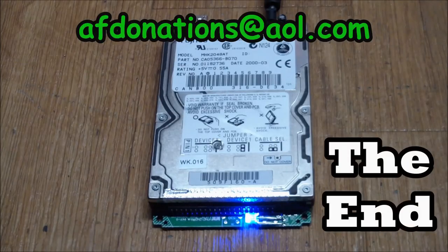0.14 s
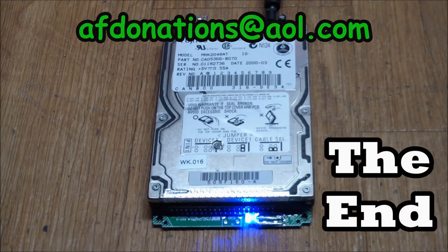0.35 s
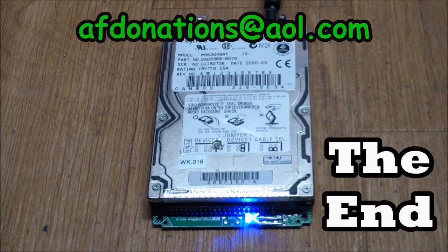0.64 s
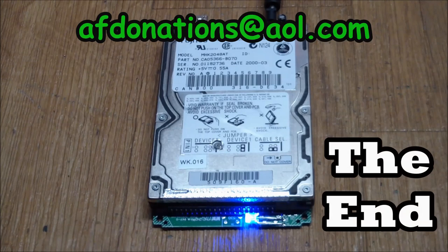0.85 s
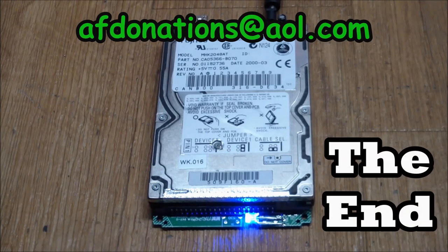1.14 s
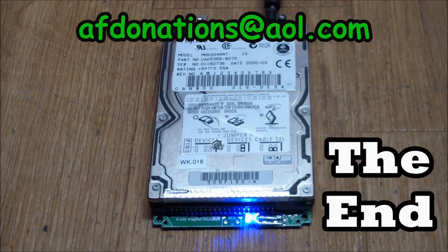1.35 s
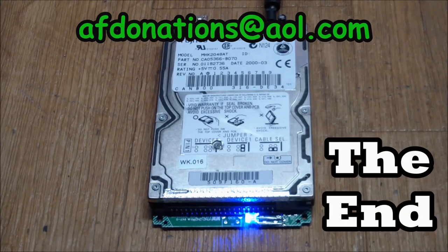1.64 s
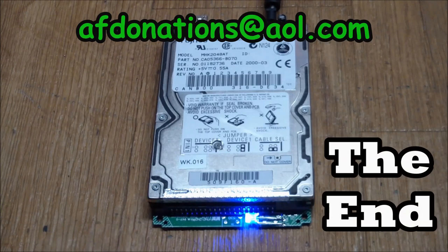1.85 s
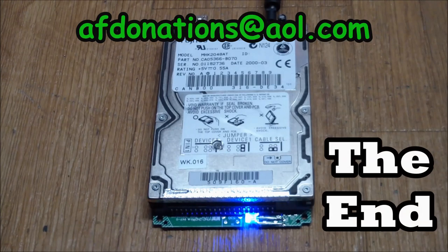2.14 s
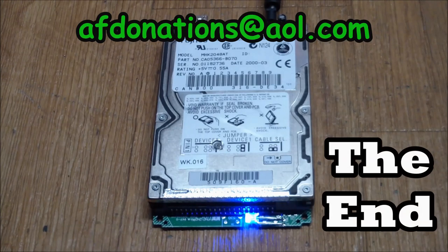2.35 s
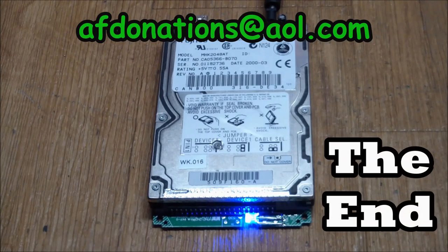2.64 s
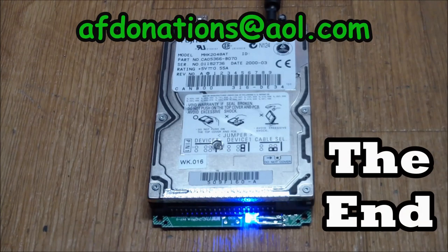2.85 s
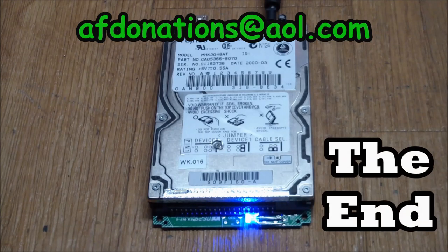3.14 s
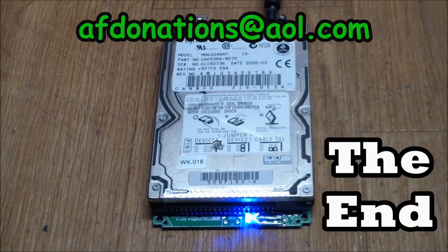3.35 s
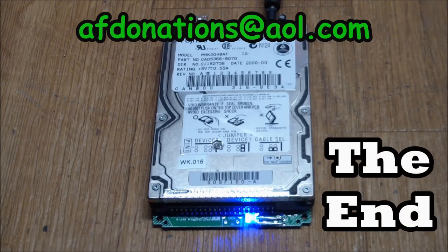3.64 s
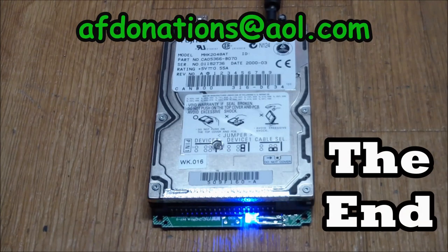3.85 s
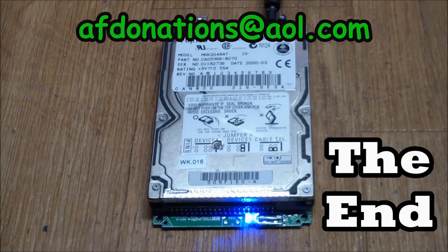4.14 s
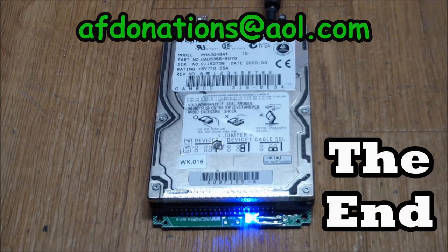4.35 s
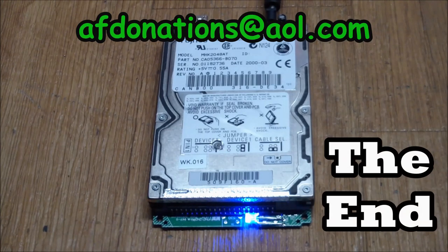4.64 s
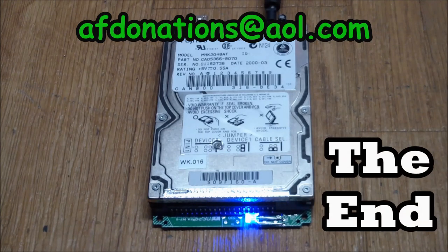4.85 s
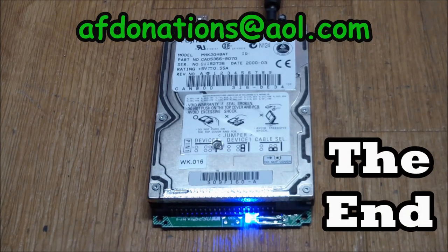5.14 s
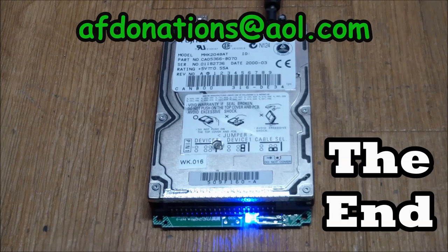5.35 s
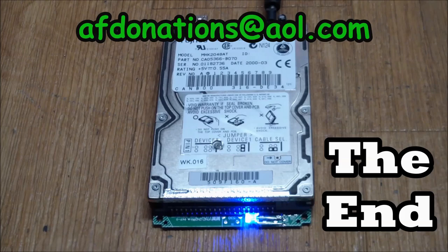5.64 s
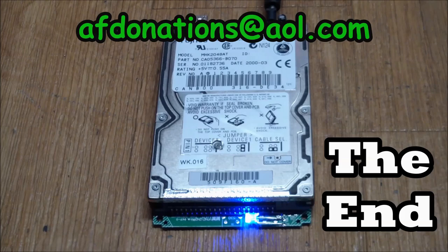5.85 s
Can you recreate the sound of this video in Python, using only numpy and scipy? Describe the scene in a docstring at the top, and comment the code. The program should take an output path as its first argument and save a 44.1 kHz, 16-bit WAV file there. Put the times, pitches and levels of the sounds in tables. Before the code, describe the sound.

Close up in a small room, a broken hard drive spins with a thin, wavering metallic whine and soft hiss over a low hum. Sharp, ringing clicks stand out above it roughly every half second, alternating between a single knock and a knock with a quick, softer rebound as the arm latches. The clicking hesitates once around the middle, then resumes in the same rhythm.

```python
"""A failing laptop hard drive, lying on a wooden floor a hand's width from the microphone.
About once a second, in rounds of three tries, the head arm swings out and knocks on its stop,
then swings back, knocks again and drops into its latch; each blow rings the case.
The spindle's ball bearings whine throughout, over platter hiss and the low hum of a small room."""
import sys
import numpy as np
from scipy import signal
from scipy.fft import rfft, irfft
from scipy.io import wavfile

SR = 44100
rng = np.random.default_rng(int(sys.argv[2]) if len(sys.argv) > 2 else 0)


def generate_wav(signal):
    """Clip the signal to [-1, 1] and save it as 16-bit WAV at the path in sys.argv[1]."""
    frames = np.transpose(np.atleast_2d(signal))
    scaled = np.clip(frames, -1, 1) * 32767
    pcm = np.round(scaled).astype(np.int16)
    wavfile.write(sys.argv[1], SR, pcm)


N = 263718
T = np.arange(N) / SR
SIDES = np.array([[1], [-1]])  # left, right


def undb(db):
    """Decibels to gain."""
    return 10 ** (np.asarray(db) / 20)


def unit(x):
    """Scale to rms 1."""
    return x / np.sqrt(np.mean(x ** 2))


def colour(x, points):
    """Filter by (freq_hz, gain_db) points joined on a log-frequency axis."""
    hz, db = np.transpose(points)
    bins = np.fft.rfftfreq(N, 1 / SR) + 1
    return irfft(rfft(x) * undb(np.interp(np.log(bins), np.log(hz), db)), N)


def noise(points):
    """Coloured noise of rms 1."""
    return unit(colour(rng.standard_normal(N), points))


def walk(rate):
    """A random drift of spread near 1 that turns about rate times a second."""
    steps = rng.standard_normal(1024)
    return np.interp(T * rate, np.arange(len(steps)), steps)


def swell(curve):
    """A (time_s, level_db) curve, in dB about the mean of its points."""
    s, db = np.transpose(curve)
    return np.interp(T, s, db - np.mean(db))


def taps(rows):
    """One impulse for each (start_s, level_db) row."""
    out = np.zeros(N)
    for s, db in rows:
        if 0 <= s <= T[-1]:
            out[round(s * SR)] += undb(db)
    return out


def bursts(rows):
    """Envelope that jumps and fades for each (start_s, fade_s, level_db) row."""
    return sum(undb(db) * (T >= s) * np.exp(-np.abs(T - s) / fade) for s, fade, db in rows)


def through(x, response):
    """Convolve, keeping the length."""
    return signal.fftconvolve(x, response)[:N]


def softened(x, hz):
    """A soft contact pushes for longer and so loses its treble."""
    return signal.sosfilt(signal.butter(2, hz, fs=SR, output="sos"), x)


def swings(rounds_s=(-.0986, 3.4586), retry_s=1.0187, back_s=.5379, out_db=0.45, back_db=-0.5):
    """Three tries a round, two knocks a try: rows of (start_s, level_db, swing: 0 out, 1 back)."""
    tries = [start + k * retry_s for start in rounds_s for k in range(3)]
    return [(s, out_db, 0) for s in tries] + [(s + back_s, back_db, 1) for s in tries]


def spindle_turning(sag=.0012, recover_s=0.11, wander=0.00041):
    """The spindle's running time: it slows a little as the arm swings back, then catches up."""
    drag = sum(np.exp(-((T - s + recover_s) / recover_s) ** 2) for s, _, back in swings() if back)
    return np.cumsum(1 - sag * (drag - drag.mean()) + wander * walk(6)) / SR


# Bearing tones are multiples of ORDER_HZ; the turning ball cage adds a sideband on either side.
ORDER_HZ, CAGE_HZ = 192.9, 29.6
# The bearing tones that stand out up close: order, lower_sideband_db, centre_db, upper_sideband_db
LOUD_TONES = [(12, -59.5, -76.5, -52), (20, -84, -69.5, -61.5), (22, -64.5, -87, -52.5),
              (23, -60, -81, -73), (24, -66, -77, -63), (25, -61, -82, -64.5), (26, -67, -73, -53),
              (28, -64.5, -74, -61.5), (30, -70, -55.5, -65), (36, -65, -60, -72), (38, -66, -64.5, -74),
              (42, -71, -65, -68), (54, -61, -62.5, -70), (66, -66, -77, -75)]

def bearing_tones(first_order=14, last_order=78, soft_db=-65, fall_db_per_order=.11, scatter_db=5):
    """The loud tones, then the softer even orders, each shared by chance among its three lines."""
    loud_orders = [row[0] for row in LOUD_TONES]
    rows = list(LOUD_TONES)
    for order in range(first_order, last_order + 1, 2):
        shares = undb(scatter_db * rng.standard_normal(size=3))
        shares_db = 20 * np.log10(shares / np.linalg.norm(shares))
        if order not in loud_orders:
            rows.append((order, *(soft_db - fall_db_per_order * (order - first_order) + shares_db)))
    return rows


# Three places where the whine slowly swells and sinks, low to high: pitch_hz
SWELL_PITCHES = [2320, 4320, 5040]
# The rise and fall at each of them: time_s, relative_level_db
LOW_SWELL = [(0.0, -57), (1.1, -51), (1.85, -56.5), (2.28, -58), (2.68, -53.5), (3.18, -54.5),
             (4.36, -50.5), (5.46, -56), (5.98, -54.5)]
MID_SWELL = [(0.0, -58), (0.28, -65), (0.9, -53.5), (2.08, -55), (2.56, -60), (2.9, -52), (3.9, -51),
             (4.55, -55.5), (5.98, -51.5)]
HIGH_SWELL = [(0.0, -54.5), (0.78, -49.5), (1.78, -61.5), (2.58, -52), (3.71, -63), (4.46, -58),
              (5.48, -55.5), (5.98, -63)]

def whine(turning, whine_db=3, drift_db=2.1, flutter_db=1.23, jitter_rad=0.35, width_rad=0.26):
    """Each bearing tone and its sidebands follow the spindle and beat at the cage rate: a fine whirr."""
    swells = [swell(curve) for curve in (LOW_SWELL, MID_SWELL, HIGH_SWELL)]
    cage = np.exp(2j * np.pi * CAGE_HZ * turning)
    out = np.zeros((2, N))
    for order, *levels_db in bearing_tones():
        hz = order * ORDER_HZ
        near = [curve for pitch, curve in zip(SWELL_PITCHES, swells) if abs(hz - pitch) < 125]
        drift = drift_db * walk(1.47)
        gain = undb(whine_db + (near[0] if near else drift) + flutter_db * walk(50))
        lower, centre, upper = undb(levels_db) * np.exp(2j * np.pi * rng.random(3))
        beating = lower * cage.conj() + centre + upper * cage
        shake = jitter_rad * hz / SWELL_PITCHES[-1] * walk(40)  # higher orders shake more
        tone = gain * beating * np.exp(1j * (2 * np.pi * hz * turning + shake))
        # short waves reach the microphone's two ports out of step
        skew = width_rad * hz / TOP_HZ * rng.choice([-1, 1])
        out += np.real(tone * np.exp(1j * SIDES * skew))
    return out


# Outline of the many weak bearing tones: freq_hz, gain_db
SHEEN_COLOUR = [(1000, -7), (2600, 0), (3600, -13), (4500, 7), (6500, -3.5), (9000, -1.5), (12000, -26),
                (15500, -13)]
# Stereo width of sheen and platter hiss at the microphone: freq_hz, side_minus_mid_db
DRIVE_WIDTH = [(400, -3), (1500, -3.5), (3000, -24), (6000, -6), (10000, -10), (15000, 4)]

def bearing_sheen(turning, level_db=-52, line_hz=3.3, skirt_hz=42.2, odd_db=-4):
    """Weak orders and sidebands: narrow, unsteady lines that give the hiss a metallic sheen."""
    hz = np.fft.rfftfreq(N, 1 / SR)
    order = np.round(hz / ORDER_HZ)
    offset = hz - order * ORDER_HZ
    detune = offset - np.round(offset / CAGE_HZ) * CAGE_HZ
    skirts = undb(odd_db * (order % 2)) * np.exp(-(offset / skirt_hz) ** 2 / 2)
    comb = skirts / np.hypot(1, detune / line_hz)
    lines = [unit(irfft(rfft(noise(SHEEN_COLOUR)) * comb, N)) for _ in range(2)]
    mid, side = (np.interp(turning, T, x) for x in lines)  # pitch follows the spindle
    return undb(level_db) * (mid + SIDES * colour(side, DRIVE_WIDTH))


# The platters' hiss from a hand's width away: freq_hz, gain_db
HISS_COLOUR = [(100, 6.5), (400, 4), (900, 2), (1500, -2.5), (3400, -1.5), (4000, 2.5), (4600, 6),
               (5400, -4), (6200, 3), (8000, -3.5), (11500, -7.5), (15500, -9)]

def platter_hiss(level_db=-50, flicker_db=1.5):
    """Air dragged round by the platters."""
    mid, side = noise(HISS_COLOUR), colour(noise(HISS_COLOUR), DRIVE_WIDTH)
    return undb(level_db + flicker_db * walk(130)) * (mid + SIDES * side)


# Mains and fan hum, with two steady tones from the drive's spindle: pitch_hz, level_db
HUM_TONES = [(60, -55), (120, -48.5), (169, -61.5), (801, -55), (1927, -70)]
# The room's rumble beneath them: freq_hz, gain_db
RUMBLE_COLOUR = [(25, -5), (60, 3), (115, 3.5), (190, -6), (280, -21), (700, -35), (2000, -53)]
# Slow rise and fall of the bass, scaled by swell_share: time_s, relative_level_db
BASS_SWELL = [(0.2, -42.0), (1.2, -44.0), (2.3, -45.0), (3.1, -45.0), (3.9, -43.0), (5.7, -43.0)]

def hum(waver_db=2.5, jitter_rad=0.089, rumble_db=-47, side_db=-11, swell_share=0.54):
    """Mains, fan and spindle tones waver over the room's rumble; the bass swells and sinks as one."""
    bass = undb(swell_share * swell(BASS_SWELL))
    tones = np.zeros(N)
    for hz, db in HUM_TONES:
        gain = (bass if hz < 200 else 1) * np.sqrt(2) * undb(db + waver_db * walk(11))
        tones += gain * np.sin(2 * np.pi * hz * T + jitter_rad * walk(4.8))
    rumble = noise(RUMBLE_COLOUR) + undb(side_db) * SIDES * noise(RUMBLE_COLOUR)
    return tones + bass * undb(rumble_db) * rumble


# The heads catching on their ramp ahead of a knock, levels relative:
# swing (0 out, 1 back), lead_s, fade_s, scrape_db, ping_db, jolt_db
RAMP_CONTACTS = [(0, .040, .004, -36, -29, -22), (0, .0282, .0015, -36, -32, -29),
                 (0, .020, .002, -44, -30, -50), (0, .008, .001, -41, -50, -29),
                 (1, .064, .009, -43, -41, -37)]
# The rubbing, heard close: freq_hz, gain_db
RAMP_COLOUR = [(250, -24), (480, 7), (650, -11), (1100, -1), (2000, -16), (3100, -1.5), (3800, -3),
               (4550, -14), (5300, -21), (9000, -10), (15000, -32)]

def scrapes(jolt_db=2, spring_hz=4540, spring_t60_s=0.012, contact_hz=950):
    """Each swing drags the heads over the ramp: their springs ping and the case is jolted lightly."""
    rows = [(s - lead, *rest) for s, _, swing in swings()
            for way, lead, *rest in RAMP_CONTACTS if way == swing]
    rubbing = noise(RAMP_COLOUR) * bursts([row[:3] for row in rows])
    t = T[:SR // 10]
    spring = np.sin(2 * np.pi * spring_hz * t) * np.exp(-np.log(1000) * t / spring_t60_s)
    pings = through(taps([(s, ping) for s, _, _, ping, _ in rows]), spring)
    jolts = softened(taps([(s, jolt) for s, *_, jolt in rows]), contact_hz)
    return rubbing + pings + undb(jolt_db) * through(jolts, case_ring())


# Modes of the drive's case as it lies on the floor: pitch_hz, level_db, t60_s
CASE_MODES = [(405.8, -35.5, 0.13), (482.7, -34, 0.11), (678, -16.5, 0.013), (843.8, -0.64, 0.014),
              (888.2, -2, 0.054), (1030, -19.5, 0.043), (1145, -5.5, 0.0079), (1375, -10, .011),
              (1442, -31.5, 0.07), (1614, -16.5, 0.033), (1847, -34, 0.16), (2070, -11, 0.0033),
              (2350, -16.5, 0.007), (2593, -40.5, .031), (3065, -45.5, 0.093), (3100, -32, 0.014)]

def case_ring():
    """The case's answer to one blow; neighbouring modes swing in opposite directions."""
    t = T[:SR // 4]
    return sum(-(-1) ** k * undb(db) * np.sin(2 * np.pi * hz * t) * np.exp(-np.log(1000) * t / t60)
               for k, (hz, db, t60) in enumerate(CASE_MODES))


# The bright edge of a knock at close range: freq_hz, gain_db
STOP_CRACK_COLOUR = [(1500, -39), (3200, 11), (4300, -2), (6000, 2.5), (8000, -10), (15000, -5)]

def knocks(crack_db=-33, crack_s=0.0034):
    """The arm's hard blows on its stop ring the case, each with a short metallic crack."""
    blows = taps([(s, db) for s, db, _ in swings()])
    crack = noise(STOP_CRACK_COLOUR) * bursts([(s, crack_s, db + crack_db) for s, db, _ in swings()])
    return through(blows, case_ring()) + crack


# One drop into the latch, first contact and rebounds: delay_s, relative_level_db
LATCH_BOUNCES = [(0, 1.5), (.01073, -3), (.0191, -11), (.0297, -15.5)]

def latches(after_knock_s=.0603, level_db=-7, contact_hz=1350):
    """Swung back, the arm drops into its latch and rebounds: a softer contact, so a duller sound."""
    drops = taps([(s + after_knock_s, level_db) for s, _, back in swings() if back])
    blows = through(drops, taps(LATCH_BOUNCES)[:SR // 10])
    return through(softened(blows, contact_hz), case_ring())


# Bumps in the background: start_s, fade_s, level_db
FAINT_BUMPS = [(3.331, 0.029, -42), (4.251, 0.038, -44.5)]
# Their muffled tone: freq_hz, gain_db
FAINT_BUMP_COLOUR = [(120, -24), (330, 2.5), (650, 2), (1100, -2.5), (2000, -32), (5000, -37)]

def bumps():
    """Two faint, dull bumps that die away quickly."""
    return noise(FAINT_BUMP_COLOUR) * bursts(FAINT_BUMPS)


# Reflections reaching the microphone from nearby surfaces: delay_s, level_db
REFLECTIONS = [(.00355, -22), (.00491, -21.5), (.00726, -19.5), (.01394, -26), (.02116, -25),
               (.02837, -23.5), (.03416, -27), (.05126, -28), (.069, -35), (.094, -35)]
# How the small room colours its tail: freq_hz, gain_db
ROOM_COLOUR = [(300, -7), (550, 10), (870, 0.5), (1200, -0.5), (1900, 2), (4000, -26), (10000, 0)]

def room(x, tail_db=-27, t60_s=0.31, build_s=.025, side_db=-4):
    """Distinct early reflections, then a weak diffuse tail that differs between left and right."""
    t = T[:SR // 2]
    build = 1 - np.exp(-(t / build_s) ** 2)
    shape = build * np.exp(-np.log(1000) * t / t60_s)
    shape = undb(tail_db) * shape / np.sqrt(np.sum(shape ** 2))
    mid, side = (through(x, shape * rng.standard_normal(len(t))) for _ in range(2))
    tail = [colour(ch, ROOM_COLOUR) for ch in mid + undb(side_db) * SIDES * side]
    return x + through(x, taps(REFLECTIONS)[:SR // 10]) + np.array(tail)


def scene():
    """The arm's noises sound in the room over the running drive."""
    arm = knocks() + latches() + scrapes()
    turning = spindle_turning()
    spindle = whine(turning) + bearing_sheen(turning) + platter_hiss()
    return room(arm) + spindle + hum() + bumps()


TOP_HZ = 15750  # upper edge of the microphone's range

def record(dry, left_treble_db=1.4):
    """A close stereo microphone: the left port is a little brighter, and the top is cut steeply."""
    ports = [colour(ch, [(3000, 0.013), (13000, sign * left_treble_db / 2)])
             for ch, sign in zip(dry, (1, -1))]
    return signal.sosfilt(signal.ellip(10, .1, 80, TOP_HZ, fs=SR, output="sos"), ports)


dry = scene()
out = record(dry)
generate_wav(out)
```